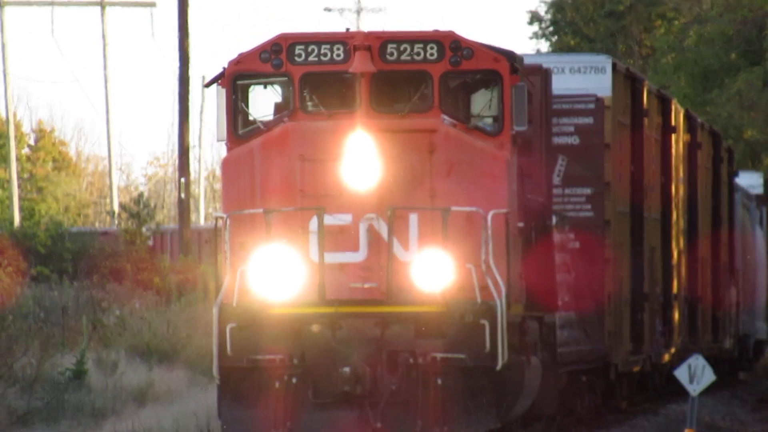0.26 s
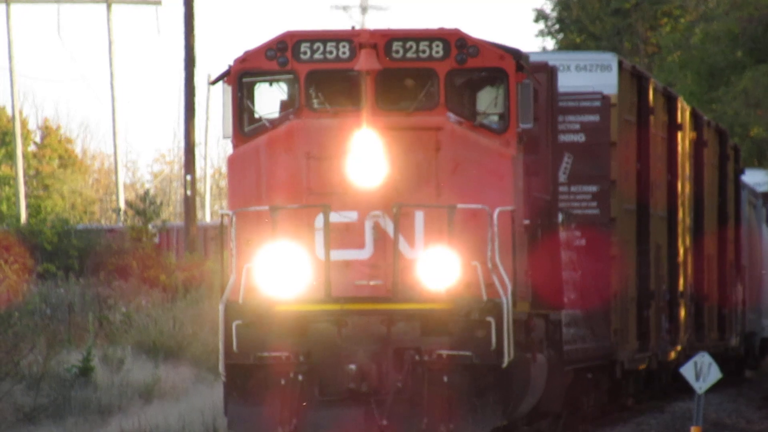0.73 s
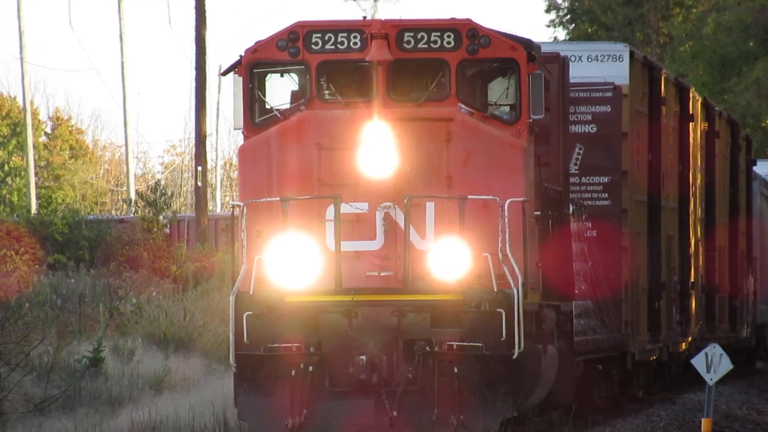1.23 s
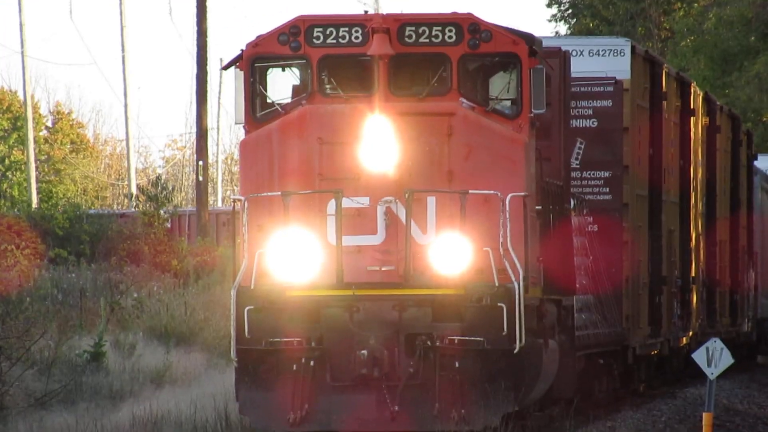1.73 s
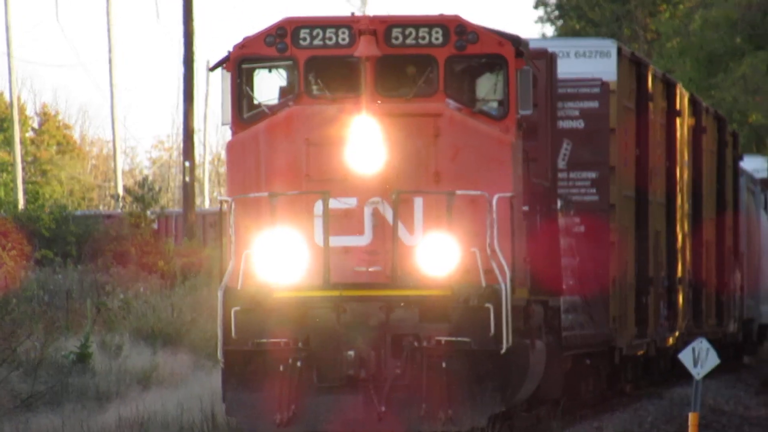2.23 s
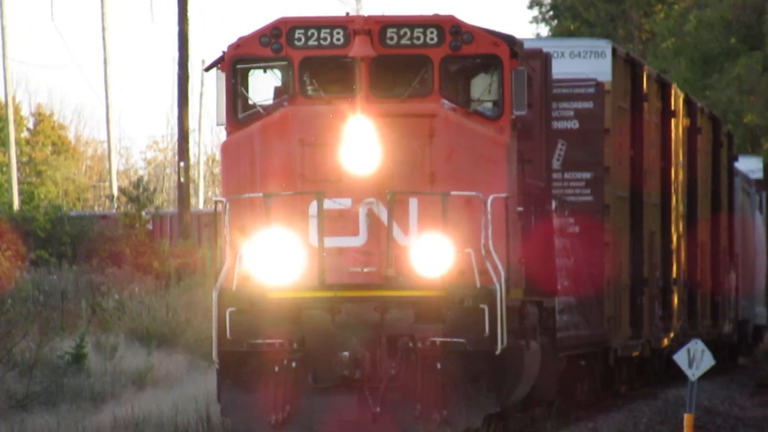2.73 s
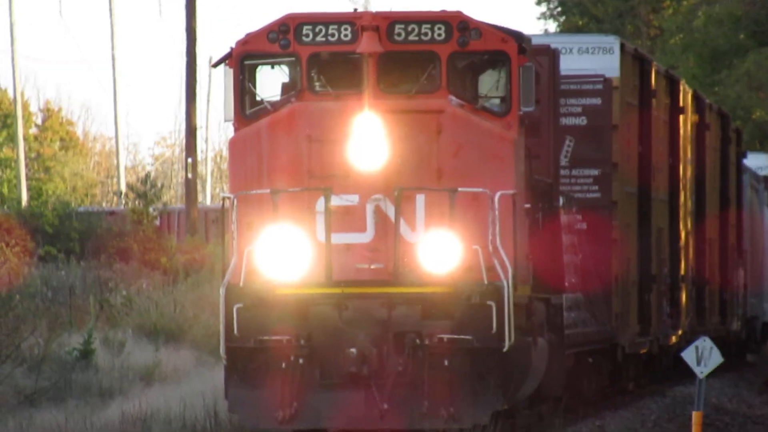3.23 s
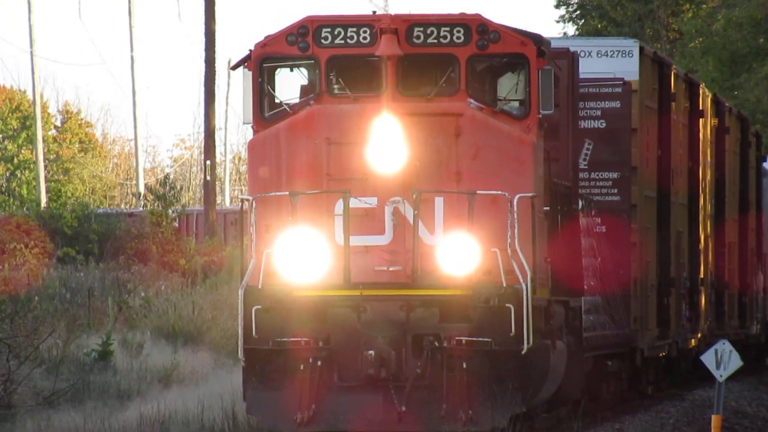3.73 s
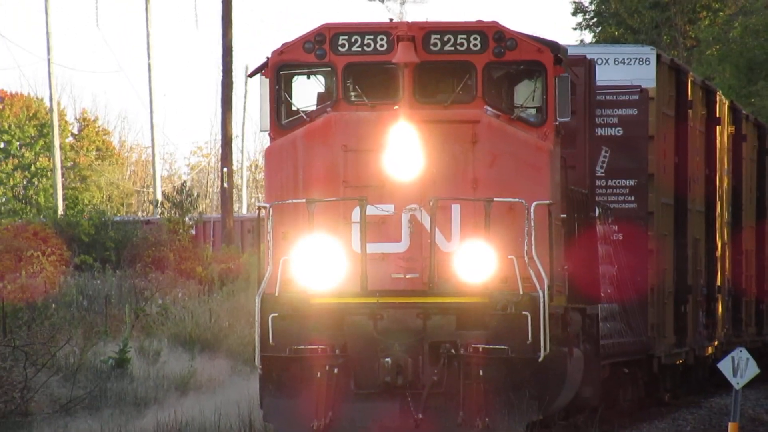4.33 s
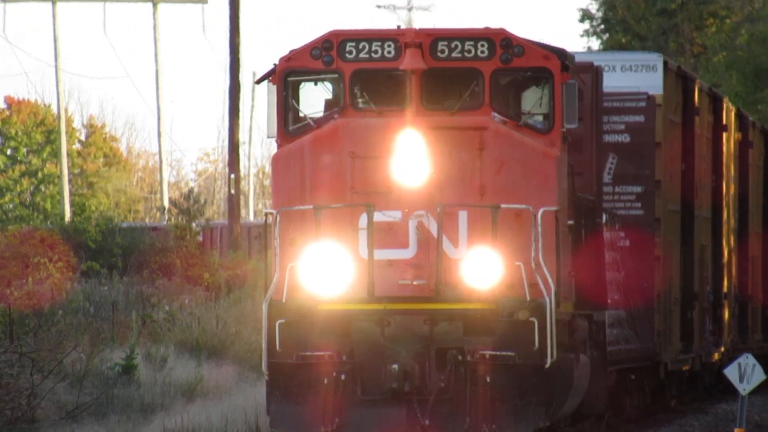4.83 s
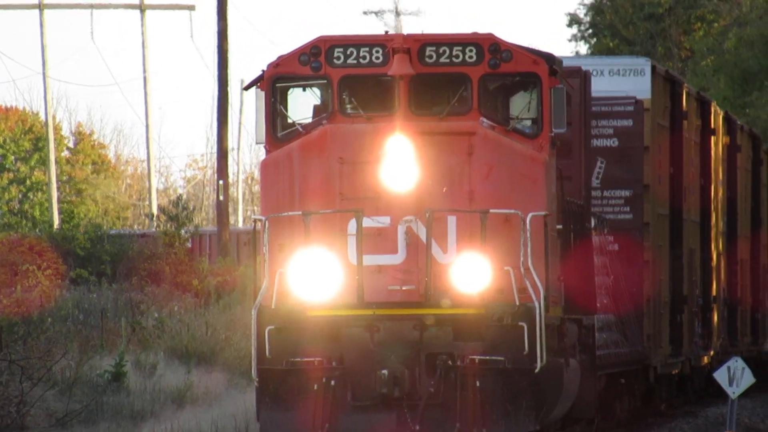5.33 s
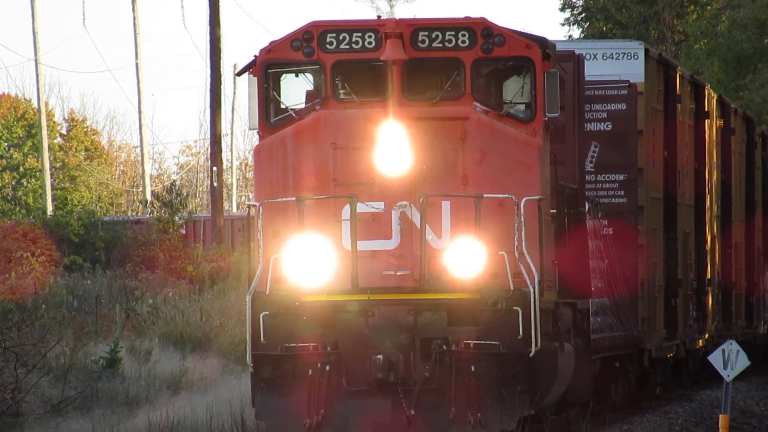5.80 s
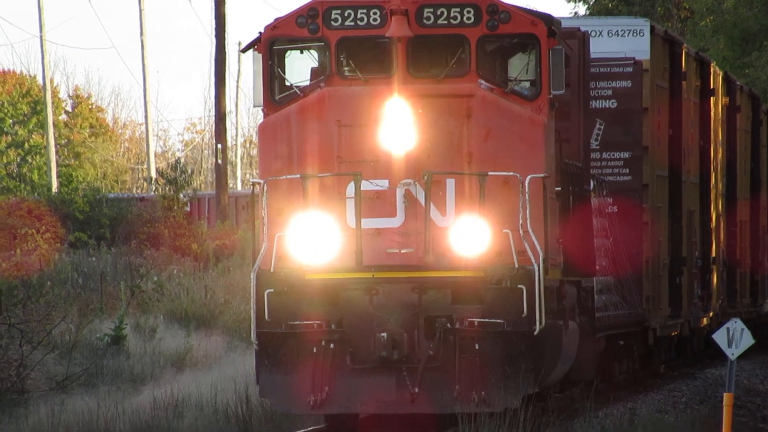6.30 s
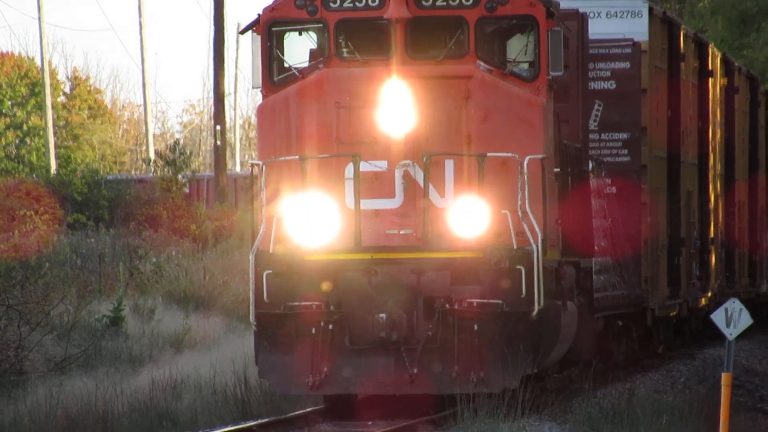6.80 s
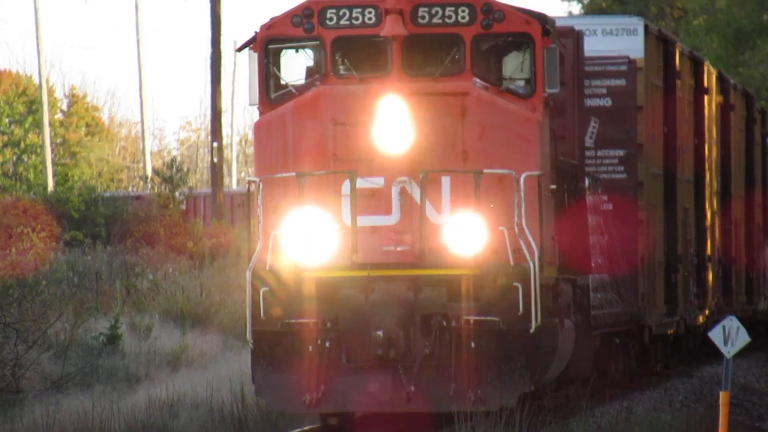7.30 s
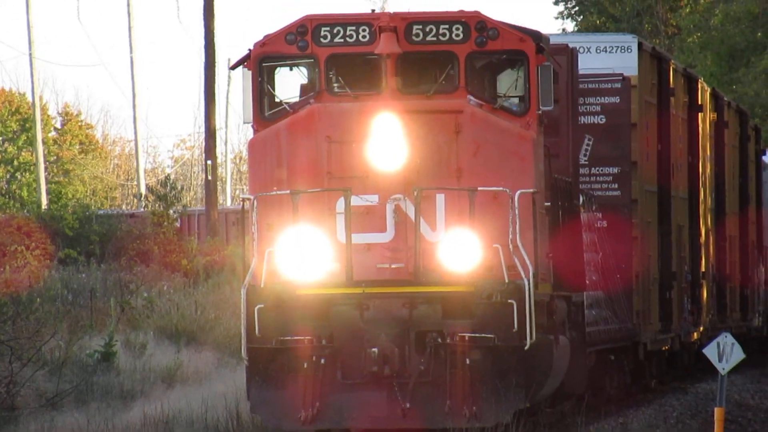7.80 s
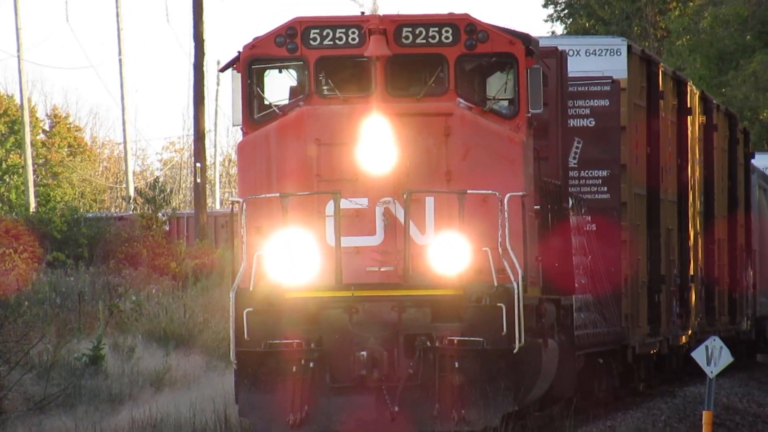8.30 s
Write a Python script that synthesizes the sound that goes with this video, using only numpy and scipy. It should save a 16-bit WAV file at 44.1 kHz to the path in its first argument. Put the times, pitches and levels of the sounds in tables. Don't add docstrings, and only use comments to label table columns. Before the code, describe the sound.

From 0 to about 8.5 seconds a large diesel locomotive idles on open track, some way from a single outdoor microphone, with no obvious reverberation. The engine keeps a steady pace: a deep, fast throb, lumpy and uneven in a pattern repeating about five times a second, with muffled thumps, valve knocks and light rattle. Low frame hum and a slow shaft rumble lie beneath. Broad fan and exhaust roar surrounds it, slightly brighter at first and fuller and duller later, with gear whine around 400 and 800 hertz and a thin, fluttering high whistle coming and going. At 2.2 seconds an air valve spits a short, soft hiss, with a very faint afterspit at 2.4. From about 5.5 seconds a sputtery rush of air gradually swells to the end. Tiny dry high ticks fall near 7.6, 7.8, 8.0 and 8.5 seconds while the idle continues unchanged.

```python
import sys
import numpy as np
from scipy import signal
from scipy.io import wavfile

SR = 44100
rng = np.random.default_rng(int(sys.argv[2]) if len(sys.argv) > 2 else 0)


def gain_from_decibels(decibels):
    exponent = np.asarray(decibels, float) / 20
    return 10 ** exponent


def log_audio(samples):
    frames = np.atleast_2d(samples).T
    limited = np.clip(frames, -1, 1)
    pcm = np.round(limited * 32767).astype(np.int16)
    wavfile.write(sys.argv[1], SR, pcm)


N = 377055
RUN_IN = SR
CRANK_TURNS_PER_S = 5.1156
GEAR_TEETH = 79

# frequency in Hz, level in dB per Hz.
ROAR_SPECTRUM = [(22, -9), (31, -20), (45, -30), (80, 1.5), (130, -2.5), (270, -4), (400, -3.5), (560, -5),
                 (800, -1), (1150, -6), (1500, -5), (1950, -9.5), (2800, -17), (3700, -35.5)]
# frequency in Hz, level in dB per Hz.
HISS_SPECTRUM = [(2500, -2.5), (4000, 4.5), (4800, 0), (6500, 1.5), (9000, -1.5), (12000, -5.5),
                 (14000, -7.5), (18000, -20)]
# frequency in Hz, level in dB per Hz.
RUSH_SPECTRUM = [(1500, -10), (2200, 12), (2800, 1.5), (4200, -7), (6700, -14), (8000, -36), (11000, -18.5),
                 (18000, -41)]
# frequency in Hz, level in dB per Hz.
SPIT_SPECTRUM = [(1500, -9), (2300, -2), (3200, -3), (4000, -12), (6200, -10.5), (8500, -21.5), (9800, -34),
                 (13000, -50)]
# time in seconds, roar level in dB, upper roar added in dB.
CARRY = [(0.0, -41.5, 3), (8.55, -39.5, -2)]
# time in seconds, level in dB.
RUSH_LEVEL = [(0, -73), (5.5, -59.5), (6.5, -54.5), (7.3, -51), (8, -49), (8.55, -48)]
# frequency in Hz, width in Hz, level in dB re the rush.
GAPS = [(2280, 220, -6), (6400, 790, -18.5), (8600, 1200, -19), (10660, 1100, -21.5), (12200, 1400, -27)]
# frequency in Hz, width in Hz, level in dB.
PANELS = [(1476, 26, -61.5), (1570, 200, -55), (2240, 160, -63), (2428, 14, -74), (2950, 20, -76),
          (3200, 320, -67)]
# peak time in seconds, rise in dB, half width in seconds.
PANEL_SWELLS = [(.7, 3.5, 0.54), (3, 4, 0.8), (5.4, 3, 0.46)]
# crank order in cycles per turn, rms level in dB.
CRANK_HUM = [(23, -60), (47, -59), (54, -58.5)]
# time in seconds, peak level in dB.
TICKS = [(7.613, -48), (7.781, -50), (7.812, -52), (8.007, -54), (8.516, -47)]
# start in seconds, level in dB, hold in seconds, 60 dB decay in seconds.
SPITS = [
    (2.155, -44, .018, .42),
    (2.36, -62, .01, .15),
]
# peak time in seconds, rise in dB, half width in seconds.
WHINE_SWELLS = [(0, 4.5, 0.26), (.8, 5.5, 0.24), (1.38, 6, .2), (2.2, 4.5, 0.34), (3.15, 3.5, 0.15),
                (3.6, 1.5, .2), (4.6, 4, 0.32), (5.2, 3, 0.33), (6.5, 3, .25), (7.8, 0.5, 0.43)]
# multiple of the mesh rate, rms level in dB, unsteadiness in dB.
GEAR = [
    (1, -51.5, .8),
    (2, -54.3, 1.6),
    (2 - 2 / GEAR_TEETH, -57.5, 1.6),
    (3, -60, 2.5),
]
# peak time in seconds, rise in dB, half width in seconds.
GEAR_SWELLS = [(1, 9, 0.42), (3.1, 9, 0.31), (5.3, 5, 0.99), (7.3, 8, 0.88), (8.55, 8.5, 0.25)]
# period in seconds, time of greatest lead in seconds, crank lead in degrees.
HUNT_SWINGS = [
    (2.2, 1.55, .3),
    (6.6, 1.3, .2),
]
# crank angle in degrees, strength in dB.
BLOCK_THUMPS = [(18.0, -67), (85.6, -72.5), (115.2, -72.5), (161.2, -69), (176.6, -73), (270.8, -71),
                (316.6, -68), (334.8, -73)]
# crank angle in degrees, strength in dB.
VALVE_KNOCKS = [(4.4, -70.5), (47, -75.5), (86.5, -74.5), (118.8, -74), (148.8, -77), (213.8, -72.5),
                (279, -75), (328.3, -79)]
# crank angle in degrees, strength in dB.
FIRINGS = [(9.9, -44.3), (38.5, -40.4), (46.4, -36.5), (76.1, -42.2), (108.6, -40.1), (117.9, -40.3),
           (144.8, -42.9), (173.9, -42.9), (183.7, -37.0), (212.6, -35.9), (224.5, -39.3), (255.4, -43.1),
           (287.9, -37.3), (297.6, -43.3), (324.0, -50.5), (356.1, -41.7)]
# frequency in Hz, width in Hz, share.
BLOCK = [(145, 130, 1)]
COVERS = [(265, 150, 1)]
HOOD = [(790, 300, 1)]
STACK = [(80, 22, 1), (41, 10, .25)]


def rms_one(x):
    return x / np.sqrt(np.mean(x ** 2) + 1e-20)


def in_time(rows):
    s, *columns = np.transpose(rows)
    return [np.interp(np.arange(N) / SR, s, c) for c in columns]


def swells(rows):
    t = np.arange(N) / SR
    return sum(db * np.exp(-((t - s) / half_width_s) ** 2) for s, db, half_width_s in rows)


def slow_chance(rate_hz):
    r = np.exp(-80 * np.pi * rate_hz / SR)
    steps = rng.standard_normal(N // 40 + 2002)
    return rms_one(signal.lfilter([1], [1, -2 * r, r * r], steps)[2000:])


def filled(coarse):
    return np.interp(np.arange(N) / 40, np.arange(len(coarse)), coarse)


def drift(rate_hz):
    return filled(slow_chance(rate_hz))


def resonance(x, hz, width_hz, order):
    r = np.exp(-np.pi * width_hz / SR)
    section = [(1 - r * r) / 2, 0, (r * r - 1) / 2, 1, -2 * r * np.cos(2 * np.pi * hz / SR), r * r]
    return signal.sosfilt([section] * order, x)


def narrow_noise(peaks):
    return sum(gain_from_decibels(db) * rms_one(resonance(rng.standard_normal(N), hz, width_hz, order=2))
               for hz, width_hz, db in peaks)


def coloured(spectrum, patchy_db, lift_db=0):
    hz, level_db = np.transpose(spectrum)
    edges_hz = hz[0] * 2 ** np.arange(0, np.log2(hz[-1] / hz[0]), 1 / 3)
    white = rng.standard_normal((2, N + RUN_IN))
    together = slow_chance(8.5)
    lift = gain_from_decibels(lift_db)
    out, power = 0, 0
    for k, (low, high) in enumerate(zip(edges_hz, edges_hz[1:])):
        sos = signal.butter(2, [low, high], "band", fs=SR, output="sos")
        band = signal.sosfilt(sos, white[k % 2])[RUN_IN:]
        band *= gain_from_decibels(np.interp(np.log(low * high) / 2, np.log(hz), level_db))
        power += np.mean(band ** 2)
        flicker = filled(gain_from_decibels(patchy_db * (.5 * together + slow_chance(6))))
        out = out + band * flicker * (lift if low > 1000 else 1)
    return out / np.sqrt(power)


def crank_turns():
    s = np.arange(-RUN_IN, N) / SR
    lead_deg = sum(deg * np.cos(2 * np.pi * (s - top_s) / period_s) for period_s, top_s, deg in HUNT_SWINGS)
    return CRANK_TURNS_PER_S * s + lead_deg / 360


def every_turn(pattern, body, spread_db, jitter_deg):
    turns = crank_turns()
    angle_deg, level_db = np.transpose(pattern)
    when = np.arange(-6, 46)[:, None] + angle_deg / 360
    when = when + jitter_deg / 360 * rng.standard_normal(when.shape)
    size = gain_from_decibels(level_db + spread_db * rng.standard_normal(when.shape)) * SR / CRANK_TURNS_PER_S
    inside = (when > turns[0]) & (when < turns[-2])
    at = np.interp(when[inside], turns, np.arange(len(turns)))
    whole = at.astype(int)
    blows = np.full(len(turns), 1e-18)
    np.add.at(blows, whole, size[inside] * (1 - at + whole))
    np.add.at(blows, whole + 1, size[inside] * (at - whole))
    return sum(share * resonance(blows, hz, width_hz, order=4) for hz, width_hz, share in body)[RUN_IN:]


def air_hiss():
    return gain_from_decibels(-59.5) * coloured(HISS_SPECTRUM, patchy_db=.03)


def fan_roar(roar_db, upper_db):
    return gain_from_decibels(roar_db) * coloured(ROAR_SPECTRUM, patchy_db=.4, lift_db=upper_db)


def panels(roar_db, upper_db):
    return gain_from_decibels(roar_db + upper_db + swells(PANEL_SWELLS) + 39) * narrow_noise(PANELS)


def auxiliary_shaft():
    return narrow_noise([(30.5, 4, -57)])


def air_rush():
    sputter_db, sputter_per_s = 2.5, 120
    sputter = rms_one(gain_from_decibels(sputter_db * drift(sputter_per_s)))
    whisper = sputter * narrow_noise(GAPS)
    return gain_from_decibels(in_time(RUSH_LEVEL)[0]) * (coloured(RUSH_SPECTRUM, patchy_db=.8) + whisper)


def ticks():
    clicks = np.full(N, 1e-18)
    for s, db in TICKS:
        clicks[round(s * SR)] = gain_from_decibels(db + 18)
    return resonance(clicks, hz=11500, width_hz=2500, order=2)


def air_valve():
    t, shape, rise_s = np.arange(N) / SR, 0, .012
    for s, db, hold_s, t60_s in SPITS:
        rise = np.clip((t - s) / rise_s, 0, 1) ** .5
        fading_s = np.clip(t - s - rise_s - hold_s, 0, 3)
        shape = shape + rise * gain_from_decibels(db - 60 * fading_s / t60_s)
    return shape * coloured(SPIT_SPECTRUM, patchy_db=.8)


def frame():
    turns = crank_turns()[RUN_IN:]
    return sum(np.sqrt(2) * gain_from_decibels(db + drift(1.5)) * np.cos(2 * np.pi * order * turns) for order, db in CRANK_HUM)


def blower(pressure):
    whine_hz, sag_hz_per_s, whine_db = 4344, 1.3, -66
    surge = np.cos(2 * np.pi * (crank_turns()[RUN_IN:] - .1))
    pitch_hz = whine_hz - sag_hz_per_s * np.arange(N) / SR + 10 * surge + 12 * drift(15)
    whine = np.sqrt(2) * gain_from_decibels(1.8 * drift(14)) * np.sin(2 * np.pi * np.cumsum(pitch_hz) / SR)
    breath = rms_one(resonance(rng.standard_normal(N), hz=4340, width_hz=320, order=5))
    flutter = 1 + .35 * rms_one(pressure)
    level_db = whine_db + swells(WHINE_SWELLS) + 2 * surge - 1
    return gain_from_decibels(level_db) * (whine * flutter + gain_from_decibels(.5) * breath)


def gears():
    mesh = 2 * np.pi * GEAR_TEETH * crank_turns()[RUN_IN:]
    waver = .2 * drift(1.5)
    carry_db = -.5 + swells(GEAR_SWELLS)
    out = 0
    for k, db, unsteady_db in GEAR:
        level_db = db + unsteady_db * drift(6.0) + carry_db * (k == 2)
        out = out + np.sqrt(2) * gain_from_decibels(level_db) * np.sin(k * (mesh + waver))
    return out


def valve_gear():
    bounce_deg, bounce_db = 8.62, 2.5
    lag_deg, rattle_db, follows = .6, -79.5, .33
    knocks = list(VALVE_KNOCKS) + [(deg + bounce_deg, db + bounce_db) for deg, db in VALVE_KNOCKS]
    rattle = [(deg + lag_deg, rattle_db + follows * (db + 30)) for deg, db in FIRINGS]
    return (every_turn(BLOCK_THUMPS, BLOCK, spread_db=1, jitter_deg=.5)
            + every_turn(knocks, COVERS, spread_db=1, jitter_deg=.4)
            + every_turn(rattle, HOOD, spread_db=1, jitter_deg=.1))


def exhaust():
    return every_turn(FIRINGS, STACK, spread_db=.15, jitter_deg=.2)


def scene():
    roar_db, upper_db = in_time(CARRY)
    air = air_hiss() + fan_roar(roar_db, upper_db) + panels(roar_db, upper_db) + air_rush()
    events = ticks() + air_valve()
    throb = exhaust()
    engine = auxiliary_shaft() + frame() + blower(throb) + gears() + valve_gear() + throb
    return (air + events + engine)[None]


def top_cut(x):
    return signal.sosfilt(signal.butter(12, 15020, fs=SR, output="sos"), x)


def record(dry):
    return top_cut(dry)


dry = scene()
out = record(dry)
log_audio(out)
```